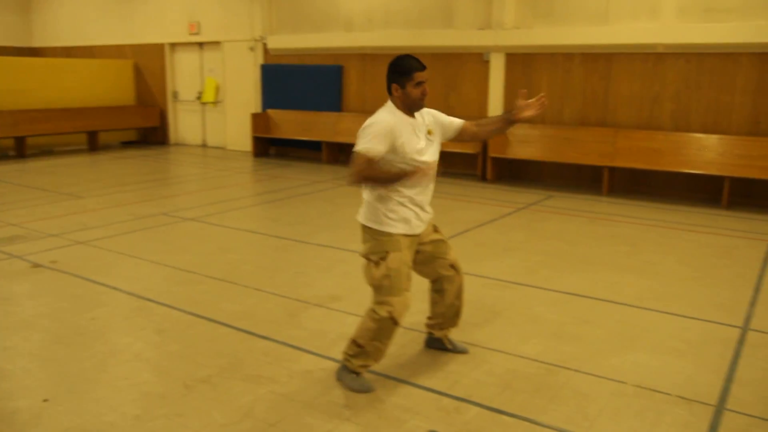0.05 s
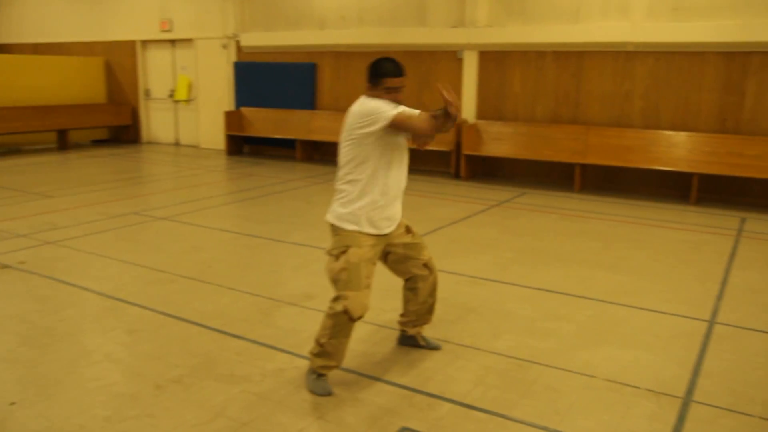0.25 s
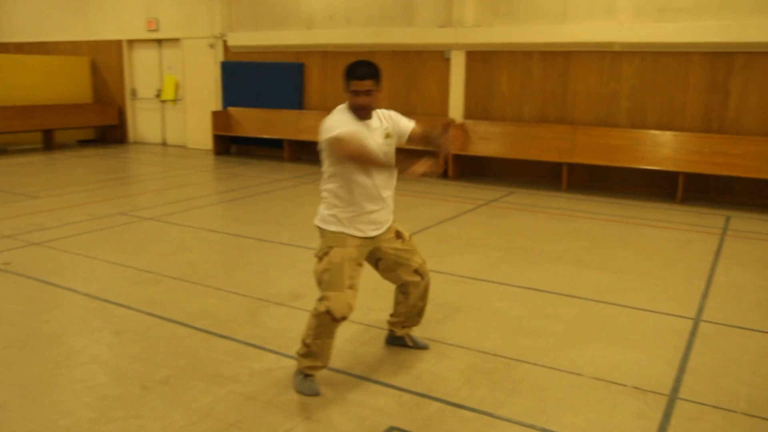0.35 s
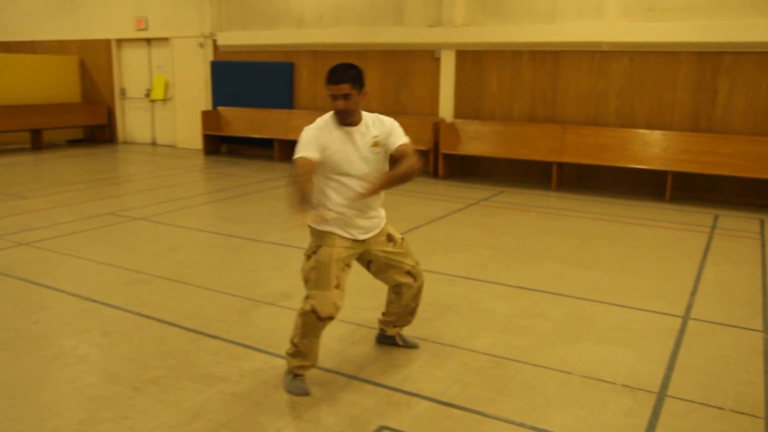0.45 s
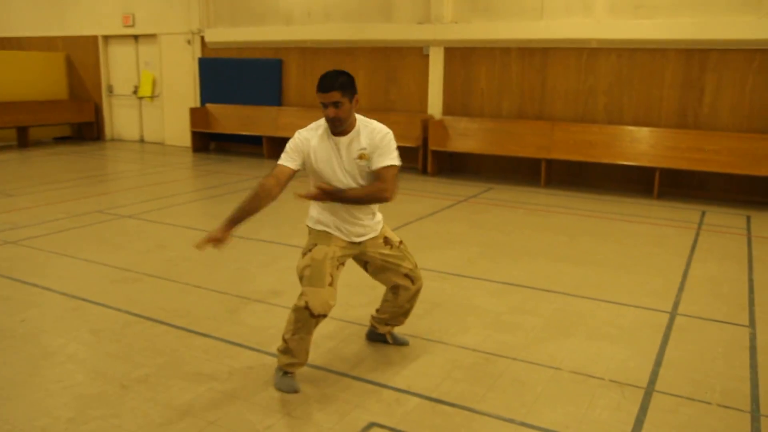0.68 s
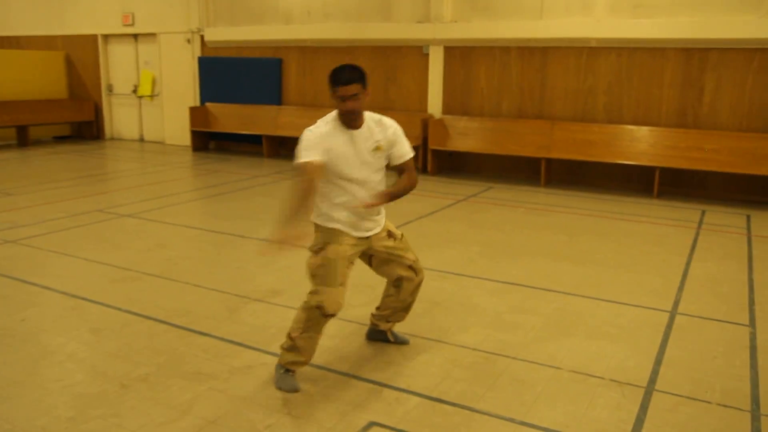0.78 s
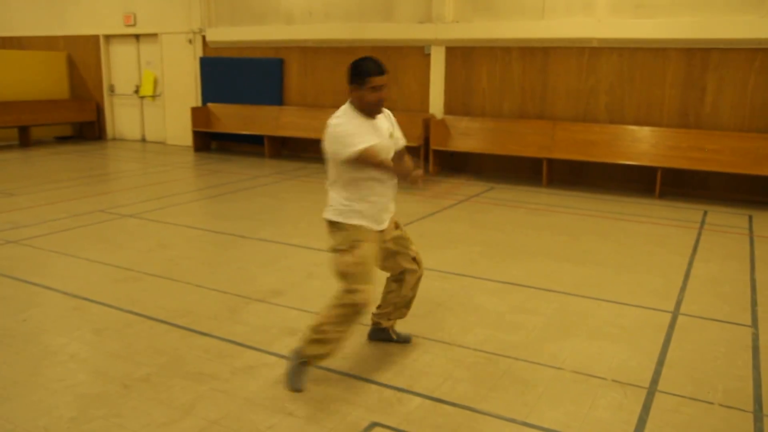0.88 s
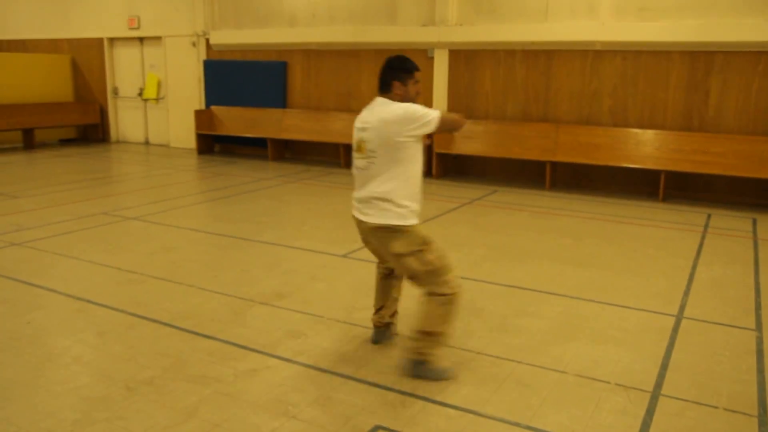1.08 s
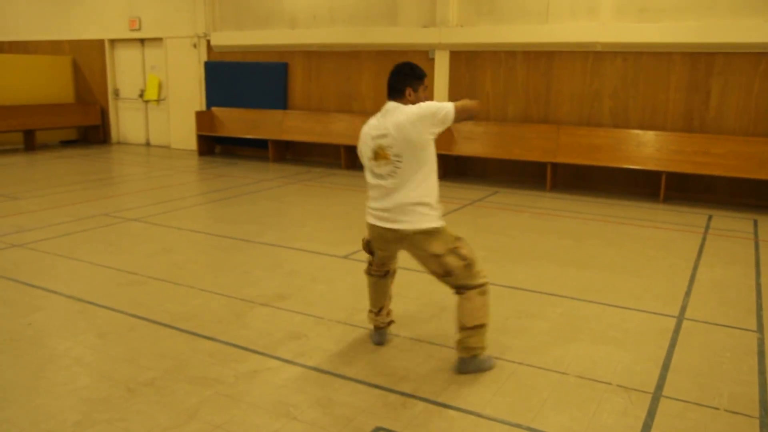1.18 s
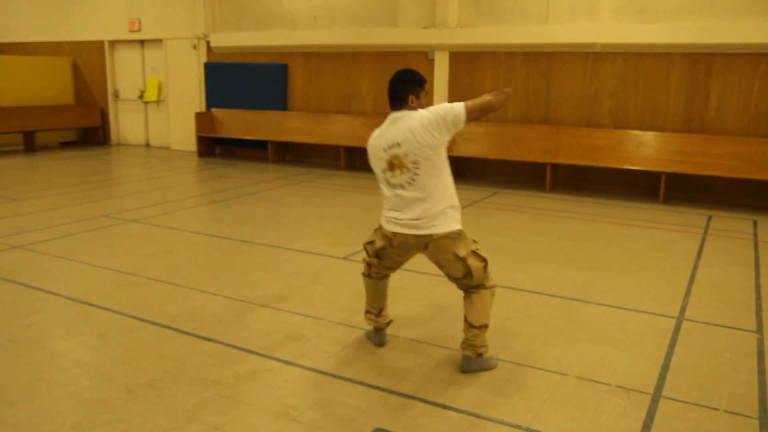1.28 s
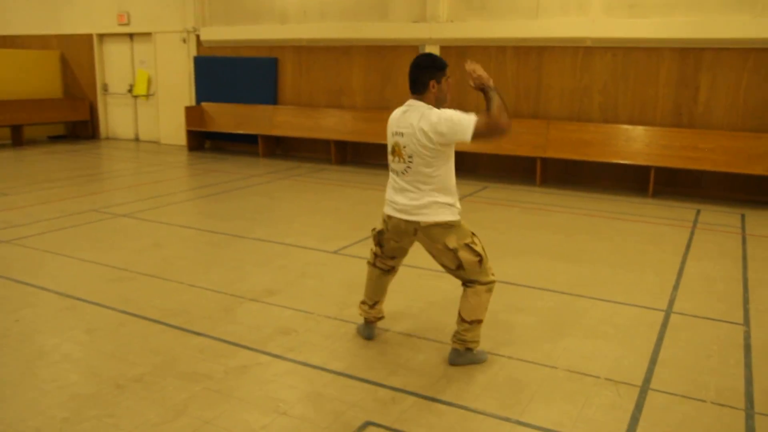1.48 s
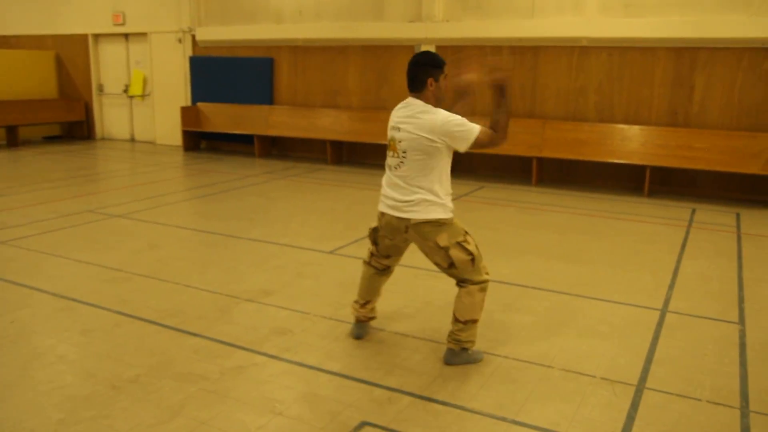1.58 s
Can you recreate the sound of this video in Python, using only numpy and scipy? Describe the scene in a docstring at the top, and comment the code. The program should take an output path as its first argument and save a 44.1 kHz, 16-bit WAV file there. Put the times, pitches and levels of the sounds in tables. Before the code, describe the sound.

A single strike cracks loudly in a gym and rings on over faint ventilation hum.

```python
"""A ventilation hum and a faint swish of clothes in a gymnasium, heard from a camera's microphone.
One sharp slap from a martial artist's strike cracks through the room: floor, walls and ceiling
return it, then the hall rings on and his clothes swish again as he turns. The camera overloads on
the crack, ducks its gain and lets it creep back, which holds the reverberation level for half a
second before it fades."""
import sys
import numpy as np
from scipy import signal
from scipy.fft import rfft, irfft
from scipy.io import wavfile

SR = 44100
rng = np.random.default_rng(int(sys.argv[2]) if len(sys.argv) > 2 else 0)


def pcm_store(signal):
    """Save signal as 16-bit PCM."""
    levels = np.round(np.clip(np.atleast_2d(signal), -1, 1) * 32767)
    wavfile.write(sys.argv[1], SR, levels.astype(np.int16).T)


N = 72765

# Room tone, the steady air of the hall. Each row: frequency in Hz, relative density in dB.
AIR_COLOUR = [(25, 10.5), (60, 5), (120, 6.5), (250, 0.5), (420, 2), (650, 1.5), (1100, -0.5), (2500, -6.5),
              (4500, -10), (8000, -18), (15500, -24)]
# Ventilation hum. Each row: frequency in Hz, level at the microphone in dB.
HUM_TONES = [(87, -53.5), (120, -57)]
AIR_DB, HUM_WIDTH_HZ = -45, 8.4

# Rubs of clothes and socks. Each row: middle in seconds, half length in seconds,
# level at the microphone in dB, centre of the hiss in Hz.
CLOTH_RUBS = [(0.028, 0.023, -52.5, 3000), (1.133, 0.094, -48.5, 13000), (1.282, 0.11, -45.5, 7460)]
# Tone of rubbing cloth. Each row: frequency in Hz, relative density in dB.
CLOTH_COLOUR = [(300, -1), (1000, 4), (3000, 7), (7000, 2), (11000, -8), (15500, -14)]
HISS_WIDTH_HZ, HISS_DB = 6000, -7

# Tone of the crack. Each row: frequency in Hz, relative density in dB.
CRACK_COLOUR = [(60, -25), (160, -19.5), (320, -2), (750, 4), (1500, -8), (2600, -2.5), (3600, -13),
                (5000, -10.5), (8000, -12.5), (12000, -6.5), (15500, -19.5)]
SLAP_S, SLAP_DB, SLAP_HOLD_S, SLAP_FADE_S = 0.2410, 21, 0.00081, 0.00059
POCKET_HZ, POCKET_WIDTH_HZ, POCKET_DB = 3855, 1050, 2.5

# Tone of the struck body. Each row: frequency in Hz, relative density in dB.
THUD_COLOUR = [(40, -22), (150, -17), (320, 2), (450, 4), (700, 3.5), (1400, -2), (3000, -0.5),
               (12000, -11)]
THUD_S, THUD_DB, THUD_FADE_S = 0.2441, 20.5, 0.00083

# Returns from floor, walls and ceiling, shortest path first.
# Each row: arrival at the microphone in seconds, level against the slap in dB.
EARLY_ECHOES = [(0.2461, -11), (.2525, -2), (.2600, -6.5), (0.263, -20), (0.2675, -12), (.2690, -12.5),
                (0.274, -13.5), (.2775, -17.5), (0.2843, -19.5), (.2870, -22), (.3010, -22)]
SCATTER_DB, SCATTER_S = -2, 0.0011

# Tone of the reverberation as it starts. Each row: frequency in Hz, relative density in dB.
HALL_COLOUR = [(50, -23), (140, -14), (230, -8.5), (380, -1), (600, -1), (900, 1), (1600, -5), (2700, -4.5),
               (3400, 1), (4000, 2), (4700, -2), (6000, -7), (7200, -6), (9000, -13), (12000, -7),
               (15500, -13)]
# Ring of the hall. Each row: frequency in Hz, time to fall 60 dB in seconds.
HALL_DECAY = [(100, 1.21), (350, 1.39), (900, 2.14), (2000, 2.17), (4000, 1.747), (6500, 1.17),
              (9500, 0.83), (14000, 0.44)]
HALL_DB, HALL_DELAY_S, HALL_BUILD_S = -2.5, 0.0061, 0.0082
MODE_HZ, MODE_T60_S, MODE_DB = 225.7, 1.57, -29

DUCK_ABOVE_DB, SENSE_S, ATTACK_S, RELEASE_DB_PER_S = -2, 0.0018, 0.0011, 37.5  # camera's gain control
LOW_CUT_HZ, HIGH_CUT_HZ = 150, 16000


def undb(db):
    """Decibels to gain."""
    return 10 ** (np.asarray(db) / 20)


def rms(x):
    """Root-mean-square level."""
    return np.sqrt(np.mean(x ** 2))


def unit(x):
    """Scale to rms 1."""
    return x / rms(x)


def along(points, hz):
    """Read a table on a log-frequency axis."""
    frequencies, values = np.array(points, float).T
    return np.interp(np.log(np.maximum(hz, 1)), np.log(frequencies), values)


def colour(x, points):
    """Minimum-phase filter shaped by rows of frequency in Hz and gain in dB."""
    size = 2 * N
    gain = undb(along(points, np.fft.rfftfreq(size, 1 / SR)))
    cepstrum = irfft(np.log(gain), size)
    cepstrum[1:N] *= 2
    cepstrum[N + 1:] = 0  # nothing sounds ahead of the attack
    return irfft(rfft(x, size) * np.exp(rfft(cepstrum)), size)[:N]


def resonate(x, hz, width_hz):
    """One resonance."""
    return signal.lfilter(*signal.iirpeak(hz, hz / width_hz, fs=SR), x)


def lag(x, seconds):
    """One-pole smoothing."""
    keep = np.exp(-1 / (seconds * SR))
    return signal.lfilter([1 - keep], [1, -keep], x)


def since(start):
    """Seconds since a moment."""
    return np.arange(N) / SR - start


def burst(start, hold, fade):
    """Envelope: instant attack, hold, exponential fade."""
    age = since(start)
    return (age >= 0) * np.exp(-np.maximum(age - hold, 0) / fade)


def noise():
    """White noise."""
    return rng.standard_normal(N)


def ventilation():
    """The gymnasium's room tone: an even rush of air with a wavering low hum."""
    hum = np.zeros(N)
    for hz, db in HUM_TONES:
        band = resonate(noise(), hz, 2 * HUM_WIDTH_HZ)
        hum += undb(db) * unit(resonate(band, hz, HUM_WIDTH_HZ))
    return hum + undb(AIR_DB) * unit(colour(noise(), AIR_COLOUR))


def swishes():
    """Cloth rubs as the body turns, faint at the microphone; each rub has its own brightness."""
    cloth = np.zeros(N)
    for middle, half_length, db, hz in CLOTH_RUBS:
        rub = unit(colour(noise(), CLOTH_COLOUR))
        hiss = undb(HISS_DB) * unit(resonate(noise(), hz, HISS_WIDTH_HZ))
        swell = np.exp(-(since(middle) / half_length) ** 2 / 2)
        cloth += undb(db) * swell * unit(rub + hiss)
    return cloth


def slap():
    """The direct crack, a few milliseconds long; air squeezed from under the palm rings briefly."""
    envelope = burst(SLAP_S, SLAP_HOLD_S, SLAP_FADE_S)
    crack = unit(colour(envelope * noise(), CRACK_COLOUR))
    squeezed_air = resonate(envelope * noise(), POCKET_HZ, POCKET_WIDTH_HZ)
    pocket = unit(resonate(squeezed_air, POCKET_HZ, POCKET_WIDTH_HZ))
    return undb(SLAP_DB) * rms(envelope) * unit(crack + undb(POCKET_DB) * pocket)


def thud():
    """The duller blow of the struck body, just behind the crack."""
    envelope = burst(THUD_S, hold=0, fade=THUD_FADE_S)
    return undb(THUD_DB) * rms(envelope) * unit(colour(envelope * noise(), THUD_COLOUR))


def echoes(direct):
    """Each surface returns the slap with a short scattered smear, the distant ones later."""
    paths = np.zeros(N)
    for arrival, db in EARLY_ECHOES:
        delay = max(arrival - SLAP_S, 0)
        path = burst(delay, hold=0, fade=SCATTER_S) * noise()
        path *= undb(SCATTER_DB) / np.linalg.norm(path)
        path[int(delay * SR)] += 1  # the mirror reflection
        paths += undb(db) * path / np.linalg.norm(path)
    return signal.fftconvolve(direct, paths)[:N]


def hall():
    """Dense reflections build around the microphone and die, treble first; one low room mode rings."""
    age = np.maximum(since(SLAP_S + HALL_DELAY_S), 0)
    spectrum = rfft(unit(colour(noise(), HALL_COLOUR)))
    hz = np.fft.rfftfreq(N, 1 / SR)
    centres = np.geomspace(60, 16000, 25)
    tail = np.zeros(N)
    for centre, band_weights in zip(centres, np.eye(len(centres))):
        band = irfft(spectrum * np.interp(hz, centres, band_weights), N)
        tail += band * undb(-60 * age / along(HALL_DECAY, centre))
    mode = np.sin(2 * np.pi * MODE_HZ * age) * undb(-60 * age / MODE_T60_S)
    build_up = np.minimum(age / HALL_BUILD_S, 1)
    return (undb(HALL_DB) * tail + undb(MODE_DB) * mode) * build_up


def scene():
    """Everything that reaches the microphone, in mono."""
    direct = slap()
    return (direct + thud() + echoes(direct) + hall() + swishes() + ventilation())[None]


def record(dry):
    """The camera ducks fast on overload and recovers steadily; peaks clip, bass and top are cut."""
    level_db = 10 * np.log10(lag(dry[0] ** 2, SENSE_S) + 1e-12)
    overload_db = np.maximum(level_db - DUCK_ABOVE_DB, 0)
    recovery_db = RELEASE_DB_PER_S * since(0)
    duck_db = np.maximum.accumulate(overload_db + recovery_db) - recovery_db
    clipped = np.clip(dry * undb(-lag(duck_db, ATTACK_S)), -1, 1)
    thinned = signal.lfilter(*signal.butter(1, LOW_CUT_HZ, "high", fs=SR), clipped)
    high_cut = signal.ellip(10, 0.1, 80, HIGH_CUT_HZ, fs=SR, output="sos")
    return signal.sosfilt(high_cut, thinned)


dry = scene()
out = record(dry)
pcm_store(out)
```